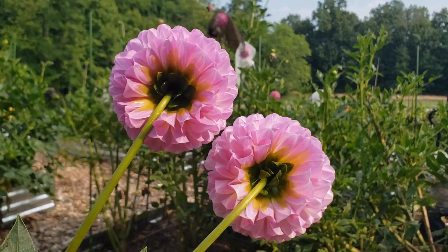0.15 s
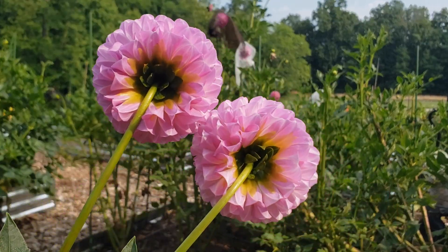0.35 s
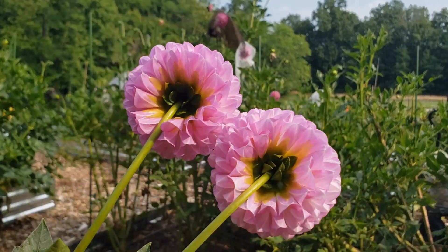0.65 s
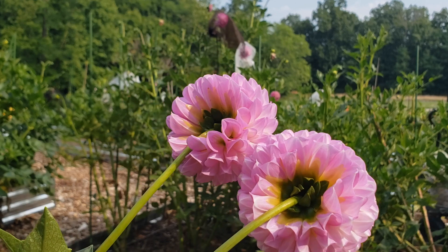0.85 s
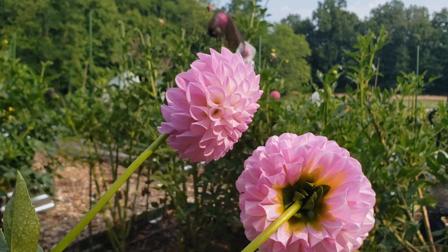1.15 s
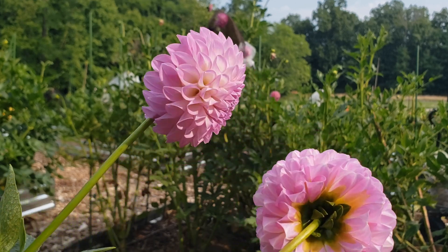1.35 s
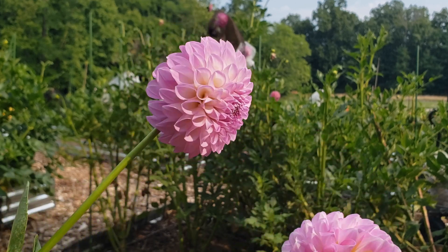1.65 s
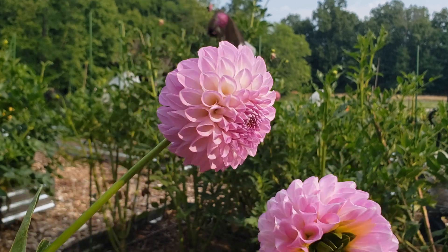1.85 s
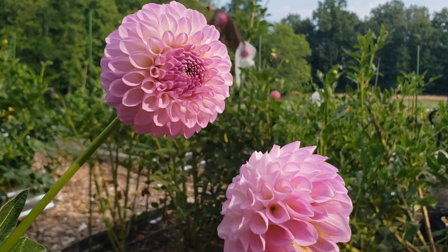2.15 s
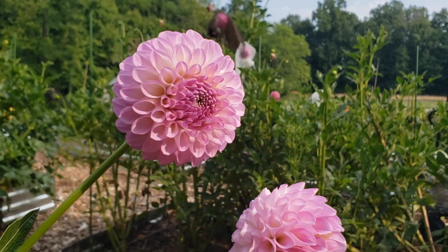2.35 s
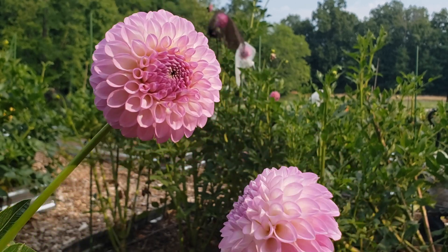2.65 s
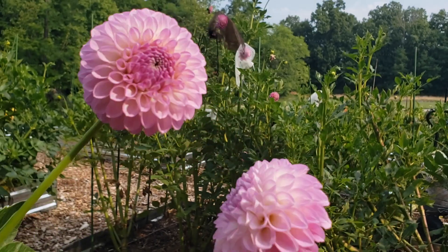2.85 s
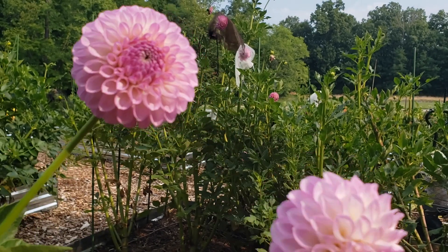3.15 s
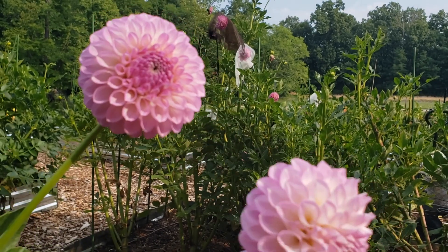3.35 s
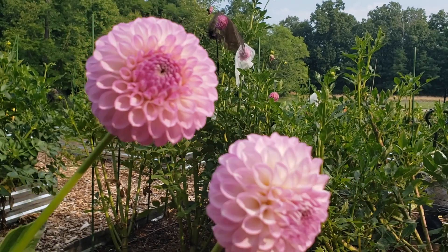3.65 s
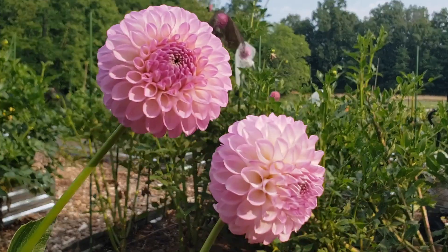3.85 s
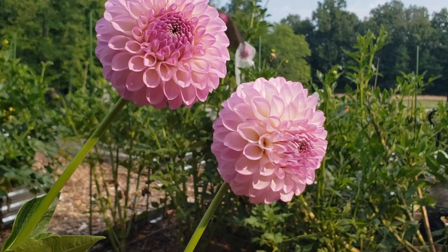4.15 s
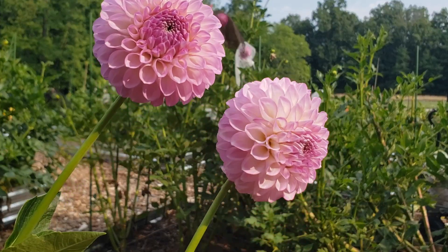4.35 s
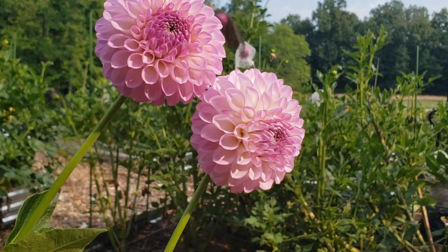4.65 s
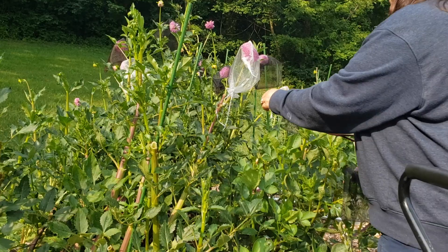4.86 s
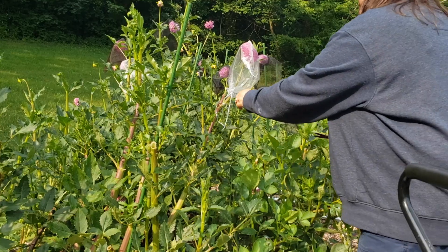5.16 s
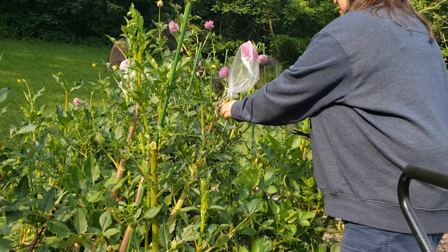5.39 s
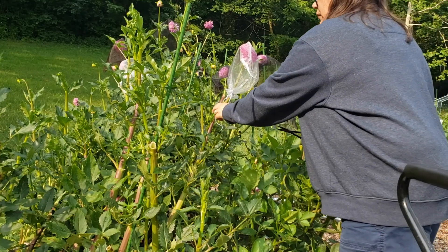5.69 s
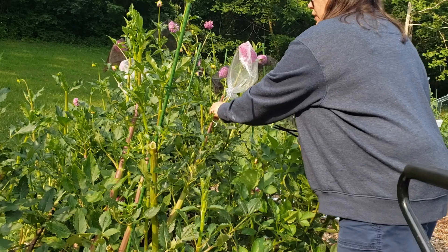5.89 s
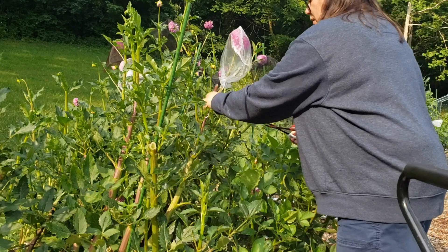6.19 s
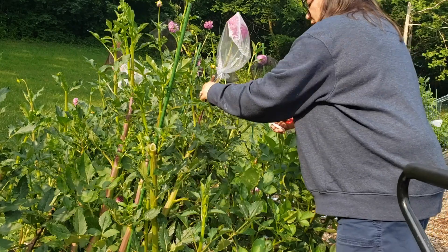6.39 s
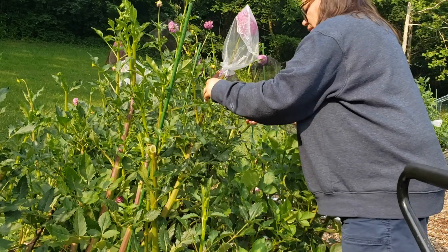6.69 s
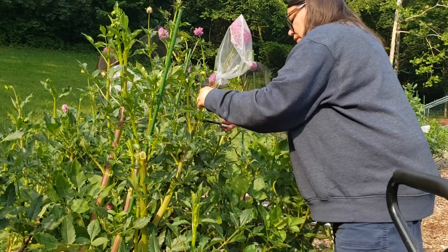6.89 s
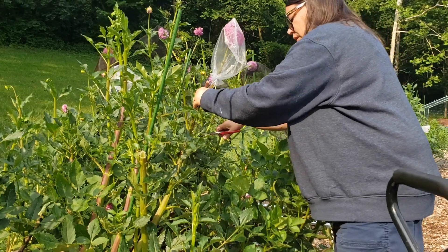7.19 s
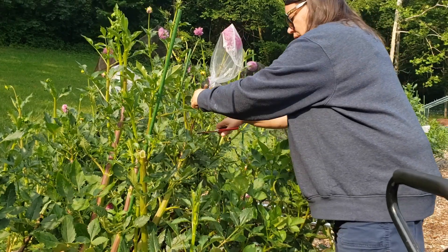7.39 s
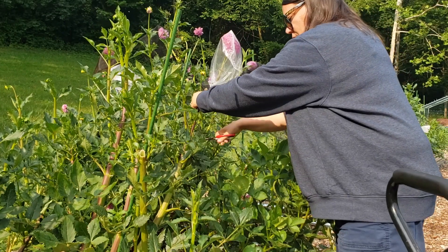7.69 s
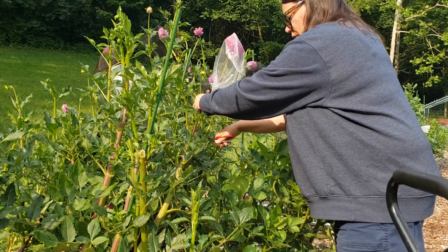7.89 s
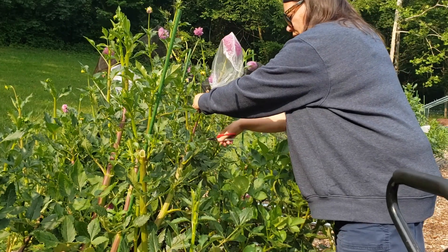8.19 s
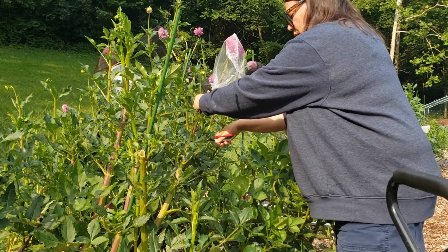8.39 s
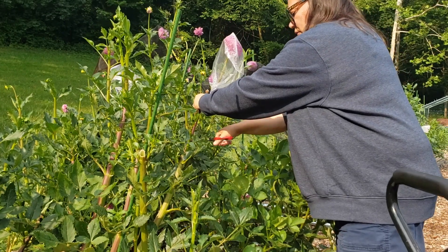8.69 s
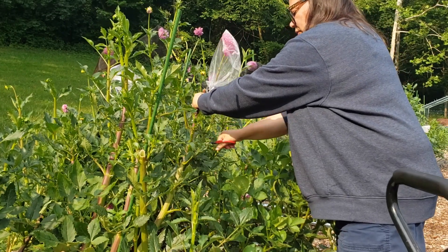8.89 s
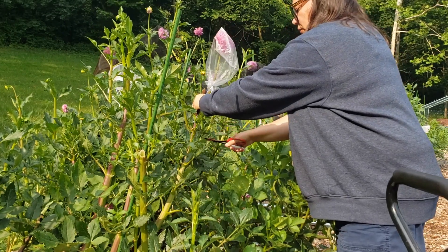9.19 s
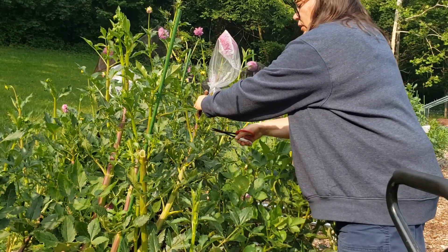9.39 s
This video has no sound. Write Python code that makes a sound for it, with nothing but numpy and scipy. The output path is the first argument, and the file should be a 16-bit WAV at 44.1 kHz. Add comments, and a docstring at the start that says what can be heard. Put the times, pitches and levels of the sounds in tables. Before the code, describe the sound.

From 0 to about 4.8 seconds, a garden hums with insects: a near cricket at around 5 kHz trills in fast, stumbling runs, each tiny stroke gliding downward, slightly right of centre. A fainter cricket pulses steadily beneath, with a shimmering far chorus, airy leaf hiss, low road rumble and wavering engine drones. Leaves brush briefly near 1.1 and, very faintly, 3.1 seconds. Short gaps in the trill come around 4.1 and 4.4. At 4.8 the place cuts abruptly: the trill is softer, leaning left, with a longer shrub echo; higher crickets pulse on the left, and a mid-low engine hum and tyre noise swell and ease. A brief gap falls near 7.6. From 8.65 to 8.85, shears crunch grainily through a stem, snapping hardest at 8.82. The trill and soft traffic continue until 9.5.

```python
"""A summer garden heard from two spots, with a cut between them at 4.76 s.
First spot: banded noise makes road rumble, leaf hiss and a shimmering far chorus, with low wavering engine tones;
a near cricket trills in stumbling runs of gliding tones, a fainter one pulses steadily, and leaves rustle twice.
Second spot: the near cricket is softer with a longer, stronger echo, and more crickets pulse higher up.
Late on, shears crunch through a stem in grainy noise and snap shut in short bursts, the trill going on to the end."""
import sys
import numpy as np
from scipy import signal
from scipy.fft import rfft, irfft, next_fast_len
from scipy.io import wavfile
from scipy.ndimage import uniform_filter1d

SR = 44100
rng = np.random.default_rng(int(sys.argv[2]) if len(sys.argv) > 2 else 0)


def store_pcm(level_fs):
    """Save levels as 16-bit WAV."""
    pcm = np.round(np.clip(level_fs, -1, 1) * 32767).astype(np.int16)
    wavfile.write(sys.argv[1], SR, np.atleast_2d(pcm).T)


N = 420713
CUT_S = 4.762


def amp(db):
    """Gain from dB."""
    return 10 ** (np.asarray(db) / 20)


def colour(table, hz):
    """Level in dB at each frequency, from a table of f/Hz, level/dB read on a log axis."""
    f, db = np.transpose(table)
    return np.interp(np.log(hz + 1), np.log(f), db)


def walk(n, rate):
    """Random levels held 1 / rate s and smoothed twice into slow slides; spread near 1."""
    hold = int(SR / rate)
    steps = np.repeat(rng.standard_normal(n // hold + 1), hold)
    slides = uniform_filter1d(uniform_filter1d(steps, hold), hold)
    return 1.299 * slides[:n]


def tinted(n, table, channels=2):
    """Noise shaped in frequency by a colour table, rms 1."""
    white = rfft(rng.standard_normal((channels, n)))
    x = irfft(white * amp(colour(table, np.fft.rfftfreq(n, 1 / SR))), n)
    return x / np.sqrt(np.mean(x ** 2))


def add(out, s, sound):
    """Mix a sound in from time s on."""
    i = max(int(s * SR), 0)
    out[:, i:i + sound.shape[1]] += sound[:, :N - i]


# Stereo width, one list per spot: f/Hz, side minus mid level/dB
WIDTH = [
    [(60, -20.5), (200, -17), (400, -4), (700, -1), (1300, 1), (4000, -0.5), (15000, 0.5)],
    [(60, -26), (200, -15), (400, -10.5), (700, -4), (1300, -0.5), (4000, 2), (15000, -1)],
]
# Stereo balance, one list per spot: f/Hz, left minus right level/dB
BALANCE = [
    [(60, .5), (400, 2.5), (700, -1), (1300, 2.5), (4400, -2.5), (8000, 14.5), (15000, -5)],
    [(60, .5), (700, 0.5), (2400, 2.5), (4400, -1.5), (8000, 9), (15000, -1.5)],
]
PASS_OCTAVES = 1.03  # how far a swell spreads in pitch either way


def wash(spot, n, shape, curves, bands_hz, flicker_db, rate, passes=()):
    """Steady noise in half-octave bands; level curves tilt it, passes swell it and each band flickers alone."""
    size = next_fast_len(n)
    hz = np.fft.rfftfreq(size, 1 / SR)
    tint = amp(colour(shape, hz))
    mid, side = rfft(rng.standard_normal((2, size))) * tint
    side = side * amp(colour(WIDTH[spot], hz))
    lean = amp(colour(BALANCE[spot], hz) / 2)
    pair = np.array([(mid + side) * lean, (mid - side) / lean])

    # The level each named band has before the curves are applied
    own_db = [10 * np.log10(2 * np.sum(tint[(hz > a) & (hz < b)] ** 2) / size) for a, b in bands_hz]
    centres = np.log2([np.sqrt(a * b) for a, b in bands_hz])
    s, *db = np.transpose(curves)
    t = s[0] + np.arange(n) / SR
    bells = [(f, top_db * np.exp(-((t - at) / length) ** 2))
             for at, length, f, top_db in passes if t[0] < at < t[-1]]

    out = 0
    for c in np.arange(np.log2(shape[0][0]), np.log2(shape[-1][0]) + .5, .5):
        gain_db = [np.interp(c, centres, np.array(row) - own_db) for row in zip(*db)]
        mask = np.clip(1 - 2 * np.abs(np.log2(hz + 1) - c), 0, 1)  # neighbours sum to one
        band = irfft(pair * mask, size)[:, :n]
        swell_db = sum(bell * np.exp(-((c - np.log2(f)) / PASS_OCTAVES) ** 2) for f, bell in bells)
        out = out + band * amp(np.interp(t, s, gain_db) + swell_db + flicker_db * walk(n, rate))
    return out


# Road drift, one list per spot: t/s, then level/dB of rumble, engines, tyres, tyre hiss
ROAD_LEVELS = [
    [(0, -58.5, -64.5, -70, -70), (4.75, -48, -64.5, -67.5, -65.5)],
    [(4.78, -51, -54, -53.5, -62.5), (9.54, -51, -66.5, -61, -70.5)],
]
# Where those four bands lie: low edge f/Hz, high edge f/Hz
ROAD_EDGES = [(30, 110), (170, 400), (480, 900), (1100, 2000)]
# Road spectrum, one list per spot: f/Hz, relative level/dB
ROAD_TINT = [
    [(20, -39), (36, -18), (50, -9), (80, -3.5), (130, -11), (200, -20), (320, -27.5), (400, -36),
     (620, -36), (760, -25), (1050, -25), (1700, -36.5), (2600, -49.5), (3400, -55)],
    [(20, -53), (36, -21), (54, -7), (100, -7), (140, -10.5), (200, -14), (250, -24), (340, -20),
     (400, -17.5), (930, -18.5), (1400, -28), (2000, -38.5), (2600, -44), (3400, -50)],
]
# Far vehicles that swell the road: middle t/s, half-length t/s, centre f/Hz, peak boost level/dB
VEHICLE_SWELLS = [(.6, 0.45, 60, 8.5), (2.22, 0.43, 840, 3.5), (3.35, .4, 60, 6), (5.2, 0.17, 100, 3),
                  (7.198, 0.73, 1500, 2), (8.05, 0.42, 756, 5.5)]


def road(spot, n):
    """Distant traffic as dark noise that flickers slowly and swells as far vehicles pass."""
    return wash(spot, n, ROAD_TINT[spot], ROAD_LEVELS[spot], ROAD_EDGES, 1.34, 5.986, VEHICLE_SWELLS)


# Garden drift, one list per spot: t/s, then level/dB of leaves, far chorus, air
GARDEN_LEVELS = [
    [(0, -66.5, -55, -69.5), (1.7, -71, -56, -75), (3.4, -73.5, -60.5, -75.5), (4.75, -71.5, -61.5, -77)],
    [(4.78, -69.5, -62.5, -71.5), (5.3, -73, -65.5, -76), (6.4, -74, -67.5, -76), (7.2, -91, -66.5, -78),
     (9.54, -86.5, -66, -78)],
]
# Where those three bands lie: low edge f/Hz, high edge f/Hz
GARDEN_EDGES = [(2600, 4000), (5800, 7200), (10000, 15500)]
# Garden spectrum, one list per spot: f/Hz, relative level/dB
GARDEN_TINT = [
    [(1500, -55), (2500, -32.5), (3200, -16.5), (4660, -5.5), (5900, -9), (7800, -15), (8400, -22),
     (10500, -17), (11500, -16.5), (14300, -9.5), (15800, -6.5)],
    [(1500, -10.5), (2200, -14.5), (2800, -28), (4000, -12.5), (4600, -2.5), (6000, -1.5), (8200, -4),
     (8500, -31), (9500, -19), (10000, -11.5), (14300, 4), (15800, 6)],
]


def garden(spot, n):
    """Leaf hiss, far cricket chorus and air as bright noise with a fast shimmer."""
    return wash(spot, n, GARDEN_TINT[spot], GARDEN_LEVELS[spot], GARDEN_EDGES, 0.98, 24.76)


# Three low engine drones, then two faint whistles, one list per tone: t/s, f/Hz, level/dB
TONES = [
    [(0, 52.5, -65), (2.8, 51.8, -61), (4.4, 50.6, -52), (4.75, 50.5, -58)],
    [(0, 80.1, -61.5), (2.7, 79.2, -65.5), (3.1, 77.2, -57), (4.75, 75, -53)],
    [(4.77, 137.4, -51.5), (5.3, 137.6, -48), (6.1, 133.9, -58), (7, 133.6, -55), (8.2, 133.8, -61),
     (9.1, 136, -50.5), (9.54, 136.4, -65.5)],
    [(4.77, 2250, -74), (5.6, 2210, -77.5), (6.2, 2173, -76), (6.42, 2160, -80)],
    [(1.3, 2550, -82), (1.4, 2550, -78), (1.53, 2560, -80)],
]
# Pitch wander of each tone: spread f/Hz, also used as its changes a second
TONE_WANDER = [3, 3, 4, 25, 20]
# Loudness flutter of each tone: spread level/dB, changes a second
TONE_FLUTTER = [(2.5, 12), (2.5, 12), (3, 16), (4.5, 50), (4.5, 70)]


def drones():
    """Far tones that wander within a narrow band, alike on both sides."""
    out = np.zeros((2, N))
    for rows, width_hz, (flutter_db, rate) in zip(TONES, TONE_WANDER, TONE_FLUTTER):
        s, hz, db = np.transpose(rows)
        t = np.arange(s[0], s[-1], 1 / SR)
        turns = np.cumsum(np.interp(t, s, hz) + width_hz * walk(len(t), width_hz)) / SR
        swell = amp(np.interp(t, s, db) + flutter_db * walk(len(t), rate))
        fade_out = np.clip((s[-1] - t) / .03, 0, 1)
        tone = np.sqrt(2) * swell * fade_out * np.sin(2 * np.pi * turns)
        add(out, s[0], tone * np.ones((2, 1)))
    return out


# Leaf brushes: middle t/s, length t/s, low edge f/Hz, level/dB
LEAF_BRUSHES = [(1.09, 0.059, 9000, -56), (3.13, .05, 12000, -68)]


def rustles():
    """Short bright brushes of leaves: noise above a low edge, swelling and fading evenly."""
    out = np.zeros((2, N))
    for s, length, low_hz, db in LEAF_BRUSHES:
        n = int(length * SR)
        hiss = tinted(n, [(1.1 * low_hz, -30), (low_hz, 0), (16000, -3)])
        add(out, s - length / 2, amp(db) * np.hanning(n) * hiss)
    return out


def stroke(length, hz, fall_hz, db, start, lag=0., skew=1.0):
    """One wing stroke: a tone that swells, sinks in pitch ever faster and dies; left hears it lag later."""
    t = np.arange(int((length + 1e-3) * SR)) / SR
    u = np.clip((t - 5e-4 - np.array([[lag], [0]])) / length, 0, 1)  # progress through the stroke
    turns = length * (hz * u - fall_hz * u ** 4.6 / 4.6)
    swell = np.sin(np.pi * u ** skew)  # a higher skew peaks later
    return amp(db)[:, None] * swell * np.sin(2 * np.pi * (turns + start))


# Steady crickets: start t/s, end t/s, strokes a second, stroke t/s, start f/Hz, fall f/Hz,
# left level/dB, right level/dB
STEADY_CRICKETS = [(4.805, 7.96, 25.775, .021, 8160, 220, -59, -85),
                   (4.83, 6.51, 25.81, .023, 7620, 700, -57.5, -72),
                   (6.53, 7.36, 25.9, .021, 7400, 450, -65, -76),
                   (7.374, 9.54, 25.98, .023, 7620, 700, -58, -72),
                   (.005, 4.75, 57, .011, 4850, 300, -56, -55),
                   (4.79, 9.54, 56, .012, 4880, 250, -63.5, -63.5)]


def singers():
    """Other crickets that each keep their own even beat, with slight scatter from stroke to stroke."""
    out = np.zeros((2, N))
    for t0, t1, rate, length, hz, fall_hz, *db in STEADY_CRICKETS:
        times = np.arange(t0, t1, 1 / rate)
        for s, (late, pitch, size, start) in zip(times, rng.standard_normal((len(times), 4))):
            wing = stroke(length, hz + 20 * pitch, fall_hz, np.array(db) + 1.2 * size, start)
            add(out, s - .45 * length + .001 * late, wing)
    return out


# Squeezes that crush fibres: peak t/s, peak level/dB, rise in dB/s, fall in dB/s
SQUEEZES = [(8.735, -39.5, 352, 500), (8.785, -48, 100, 900), (8.8225, -29.5, 2500, 1100),
            (8.861, -55.5, 100, 2000)]
# Single fibres part and the blades meet: t/s, level/dB
FIBRE_SNAPS = [(8.6625, -45), (8.6925, -41), (8.7031, -39), (8.7181, -30), (8.7245, -29), (8.732, -32),
               (8.756, -42), (8.7734, -33), (8.7829, -36), (8.815, -31), (8.8201, -22.5), (8.8222, -20.5),
               (8.8425, -46)]
# Spectrum of crunch and snaps: f/Hz, relative level/dB per Hz
SHEAR_TINT = [(600, -45), (1400, -12), (2500, -10), (3600, -8.5), (5400, -3.5), (6500, -2.5), (7300, -1.5),
              (8300, -10), (12500, -7), (15700, -8)]
SNAP_T60_S, SHEARS_PAN_DB = 0.0084, 1.5  # time to fall 60 dB; left minus right


def shears():
    """Grainy crushing of the stem as flickering noise, with sharp dying bursts on top as snaps."""
    out = np.zeros((2, N))
    t = np.arange(-.1, .1, 1 / SR)
    for s, db, rise, fall in SQUEEZES:
        slope_db = np.where(t < 0, rise, -fall) * t
        grain = amp(db + slope_db + 2.5 * walk(len(t), 900))
        add(out, s + t[0], grain * tinted(len(t), SHEAR_TINT))
    t = np.arange(SR // 10) / SR
    attack = 1 - np.exp(-t / .00015)
    decay = np.exp(-np.log(1000) * t / SNAP_T60_S)
    for s, db in FIBRE_SNAPS:
        add(out, s, amp(db) * attack * decay * tinted(len(t), SHEAR_TINT))
    return out * amp(np.array([[SHEARS_PAN_DB], [-SHEARS_PAN_DB]]) / 2)


# First stroke of each run of wing strokes: t/s
RUNS = [0.006, .127, .186, .246, .42, .66, 0.765, .94, 1.095, 1.154, 1.293, 1.386, 1.544, 1.651, 1.756,
        2.007, 2.066, 2.126, 2.25, 2.376, 2.449, 2.557, 2.696, 2.753, 2.809, 2.997, 3.073, 3.212, 3.35,
        3.445, 3.584, 3.677, 3.752, 3.824, 3.891, 4.25, 4.53, 4.652, 4.736, 4.801, 5.011, 5.17, 5.244,
        5.335, 5.394, 5.566, 5.81, 5.891, 5.973, 6.081, 6.21, 6.292, 6.369, 6.563, 6.627, 6.725, 6.87,
        6.962, 7.073, 7.165, 7.247, 7.391, 7.479, 7.8, 7.892, 7.946, 8.102, 8.289, 8.394, 8.484, 8.609,
        8.687, 8.73, 8.768, 8.795, 8.843, 8.875, 9.13, 9.363, 9.442, 9.52]
# Last stroke before each silence: t/s
SILENCES = [4.023, 4.331, 4.752, 7.479, 9.535]
# How hard the cricket sings: t/s, level/dB
SINGING_LEVEL = [(0, -37.5), (1.5, -39), (4.76, -38.5), (4.77, -47.5), (9.54, -44.5)]
# Cricket from each spot: left minus right level/dB, echo level/dB, lateness of the swell
PLACEMENT = [(-4, -19, 1.09), (4.5, -7.5, 1.7)]
# How much later the left side hears it from each spot: t/s
LEFT_LATE = [45e-6, -311e-6]
# Pitch shift at each spot, a little lower at the second: f/Hz
PITCH_SHIFT = [0, -55]
# Time for the shrub echo to fall 60 dB at each spot: t/s
ECHO_DECAY = [.06, .15]
STROKE_RATE = 61.5  # strokes a second, rounded to fit each run
STUMBLE_S = .028  # a run stops at least this long before the next begins
STROKE_S, STROKE_HZ, STROKE_FALL_HZ, STROKE_SCATTER_DB = .0112, 5315, 760, .7


def near_cricket():
    """Runs of even strokes, the first a little long; shrubs scatter a short unrelated echo to each side."""
    dry_spots = np.zeros((2, 2, N))  # spot, side, sample
    for first, after in zip(RUNS, RUNS[1:] + [np.inf]):
        rests_ahead = [s for s in SILENCES if s > first - STUMBLE_S / 2]
        last = max(first, min([after - STUMBLE_S] + rests_ahead))
        times = np.linspace(first, last, int(round((last - first) * STROKE_RATE)) + 1)
        spot = int(first > CUT_S)
        pan_db, _, skew = PLACEMENT[spot]
        db = np.interp(first, *np.transpose(SINGING_LEVEL)) + np.array([.5, -.5]) * pan_db
        for s, (late, pitch, size, start) in zip(times, rng.standard_normal((len(times), 4))):
            length = STROKE_S * (1.12 if s == first else 1)
            hz = STROKE_HZ + PITCH_SHIFT[spot] + 20 * pitch
            wing = stroke(length, hz, STROKE_FALL_HZ, db + STROKE_SCATTER_DB * size, start,
                          LEFT_LATE[spot], skew)
            to_peak = .5 ** (1 / skew) * length  # the swell peaks near time s
            add(dry_spots[spot], s - to_peak - .0006 + .0006 * late, wing)

    t = np.arange(SR // 4) / SR
    heard = dry_spots.sum(axis=0)
    for direct, t60, (_, echo_db, _) in zip(dry_spots, ECHO_DECAY, PLACEMENT):
        shrubs = rng.standard_normal((2, len(t))) * np.exp(-np.log(1000) * t / t60)
        shrubs /= np.sqrt(np.sum(shrubs ** 2, axis=1, keepdims=True))
        heard += amp(echo_db) * signal.fftconvolve(direct, shrubs, axes=1)[:, :N]
    return heard


def scene():
    """Join the two spots' backgrounds at the cut and lay the single sources over them."""
    cut = int(CUT_S * SR)
    spots = [road(spot, n) + garden(spot, n) for spot, n in enumerate((cut, N - cut))]
    return np.hstack(spots) + drones() + rustles() + singers() + shears() + near_cricket()


TOP_HZ = 15800


def record(dry):
    """A steep elliptic low-pass cuts the top."""
    return signal.sosfilt(signal.ellip(10, .2, 80, TOP_HZ, fs=SR, output="sos"), dry)


dry = scene()
out = record(dry)
store_pcm(out)
```